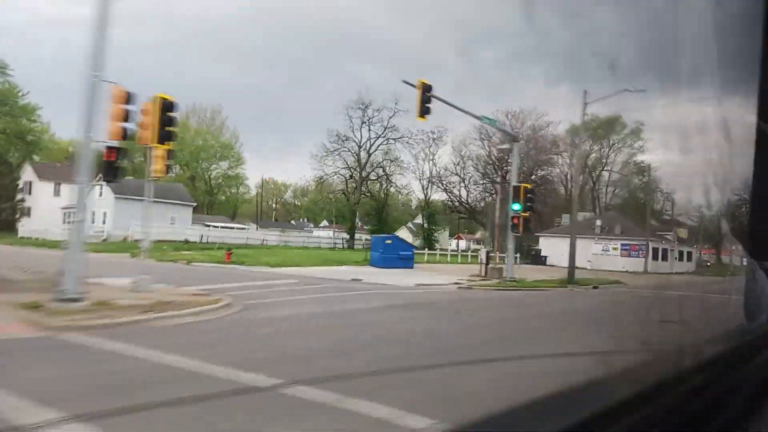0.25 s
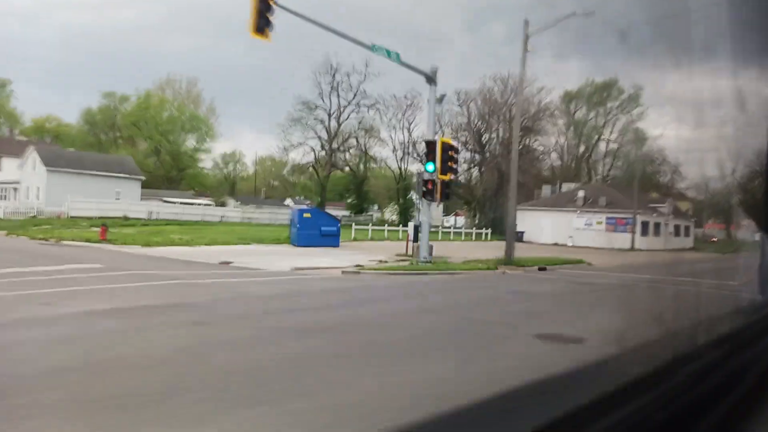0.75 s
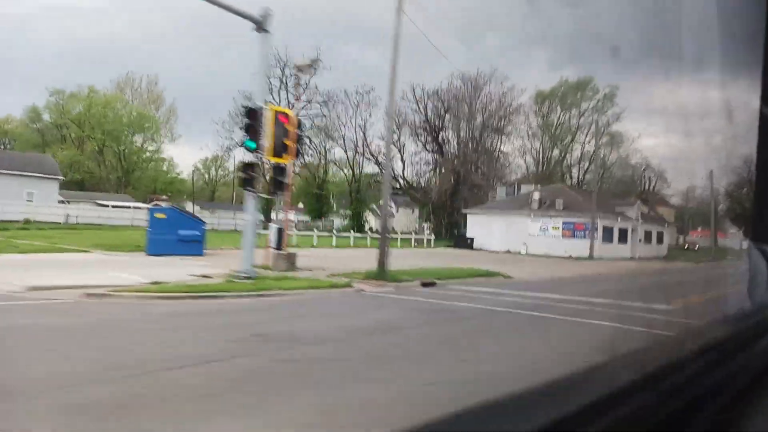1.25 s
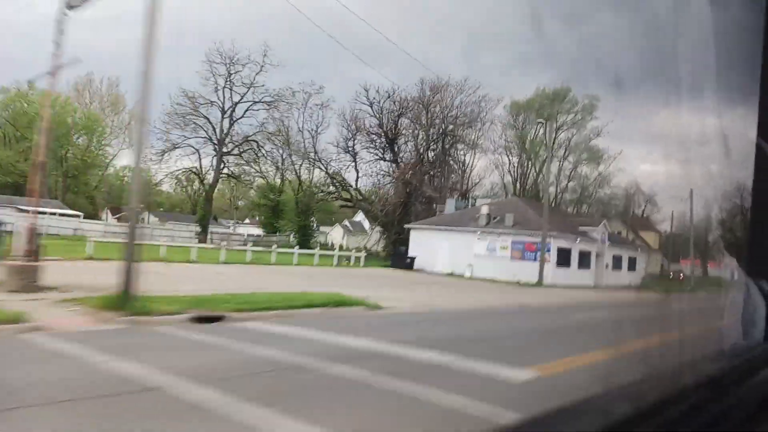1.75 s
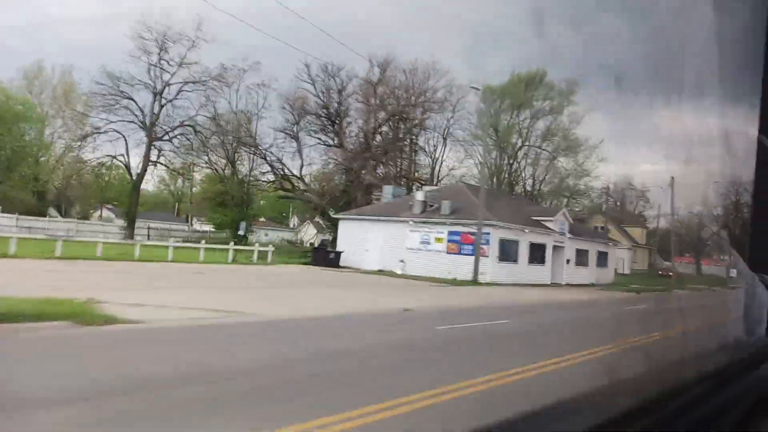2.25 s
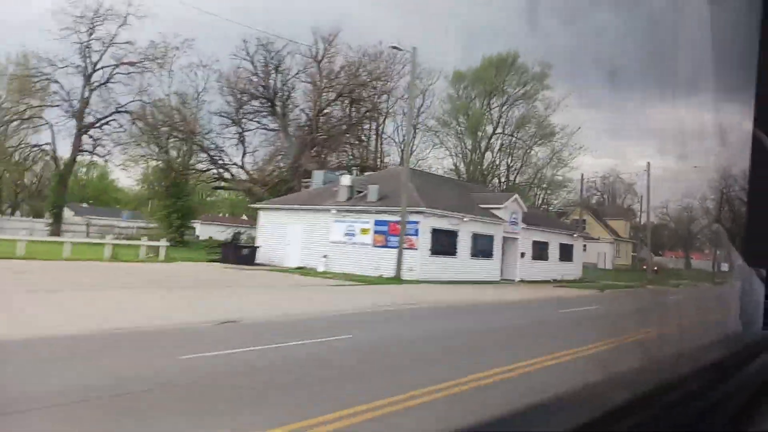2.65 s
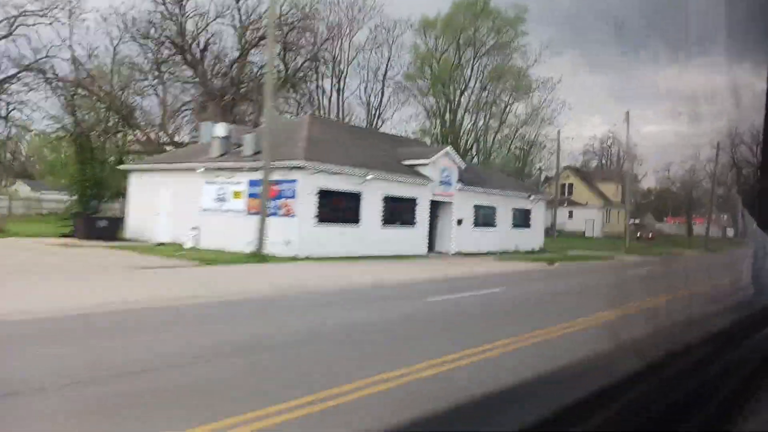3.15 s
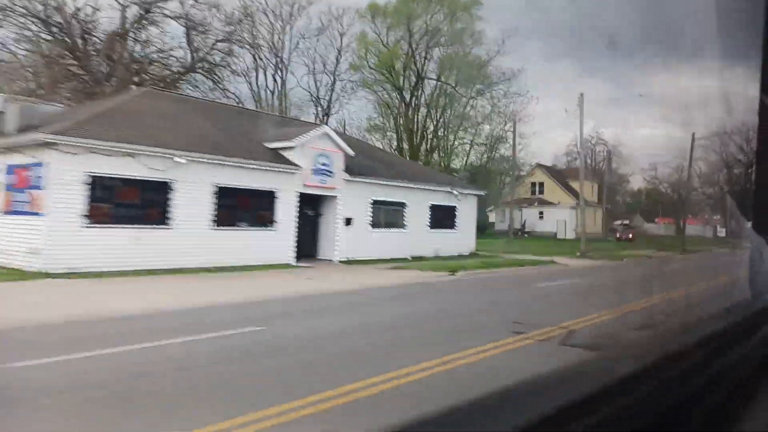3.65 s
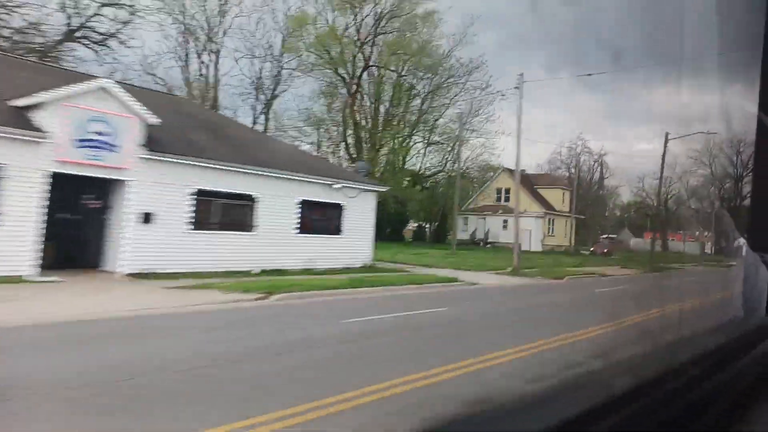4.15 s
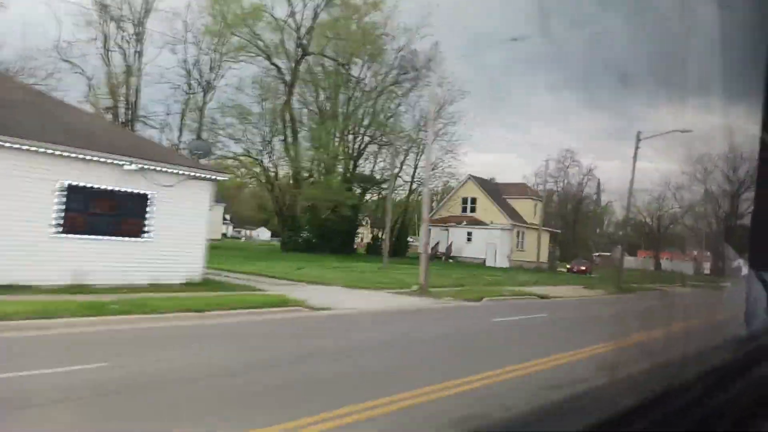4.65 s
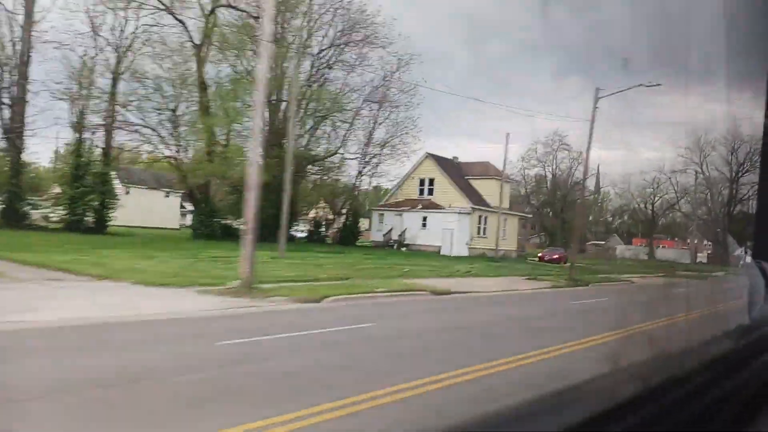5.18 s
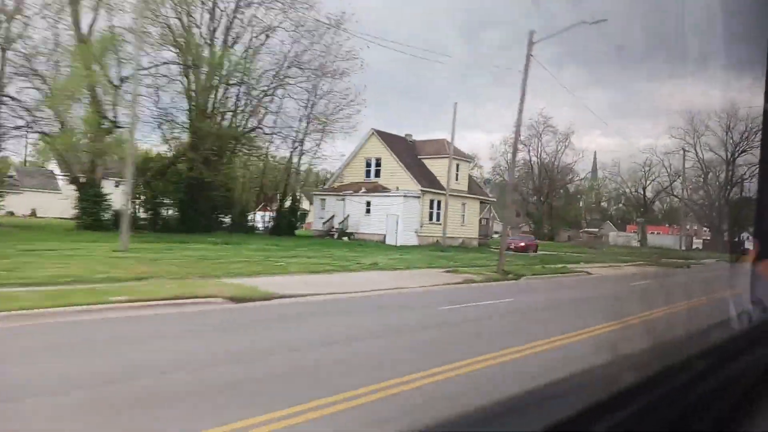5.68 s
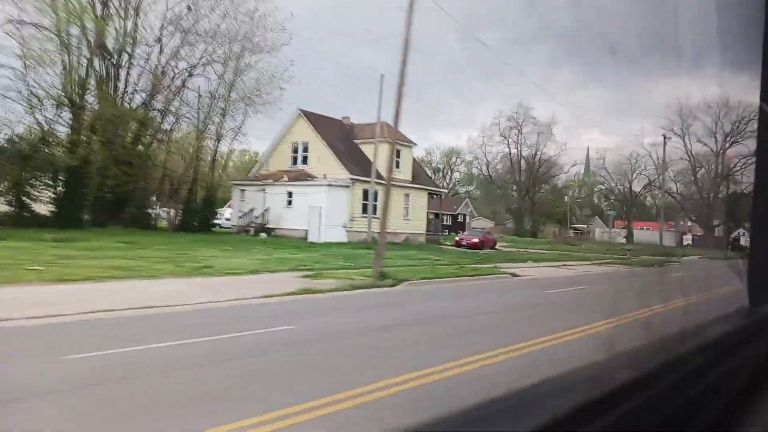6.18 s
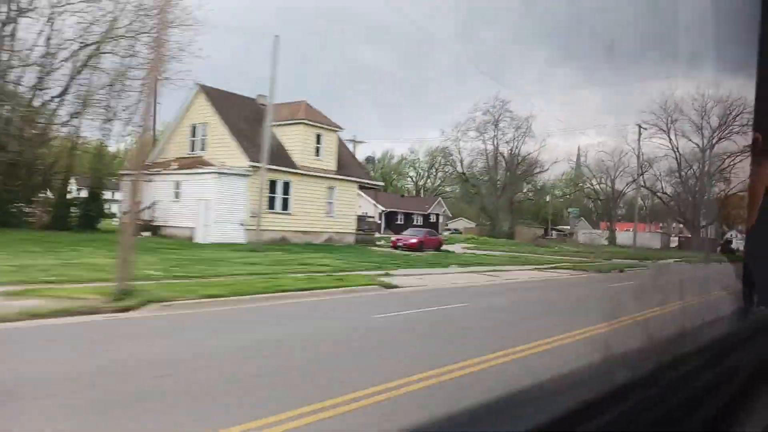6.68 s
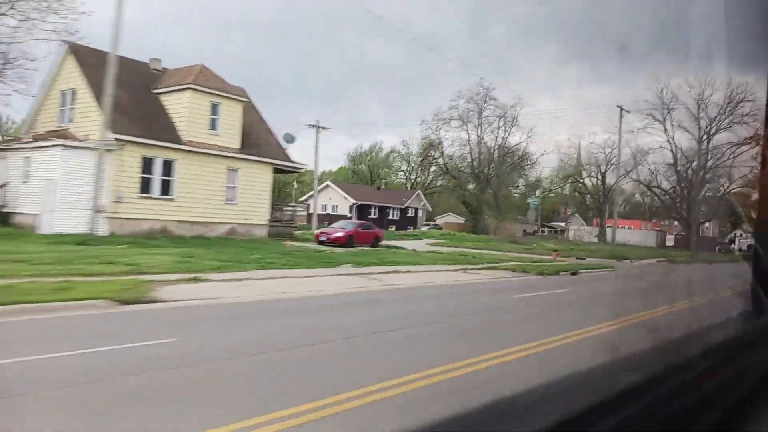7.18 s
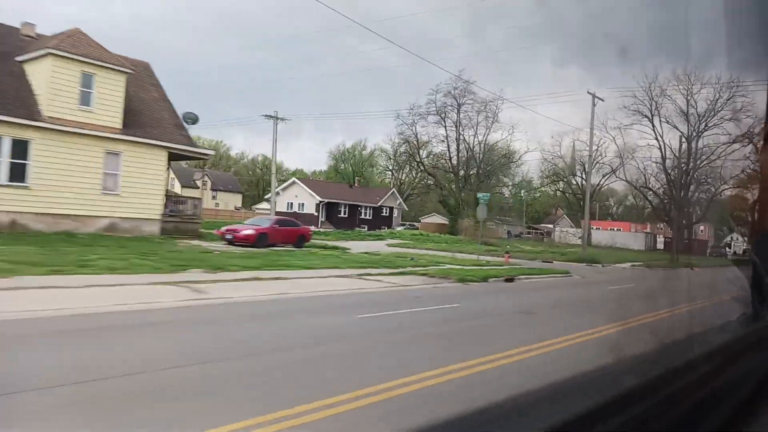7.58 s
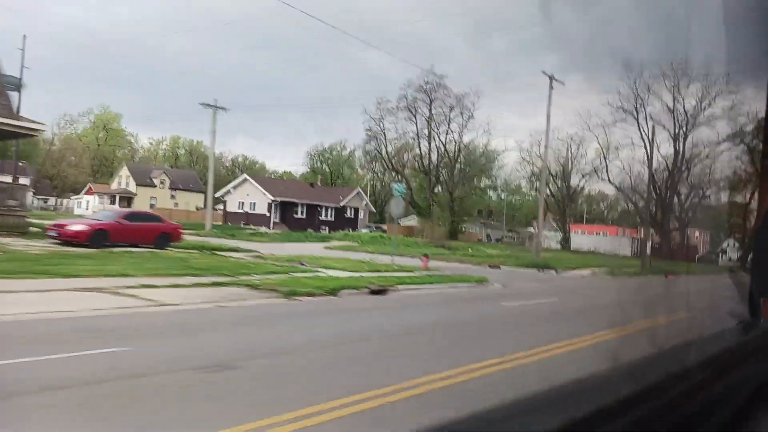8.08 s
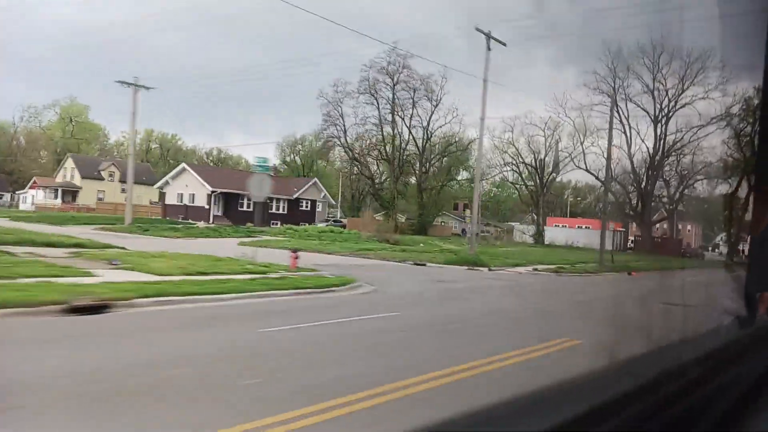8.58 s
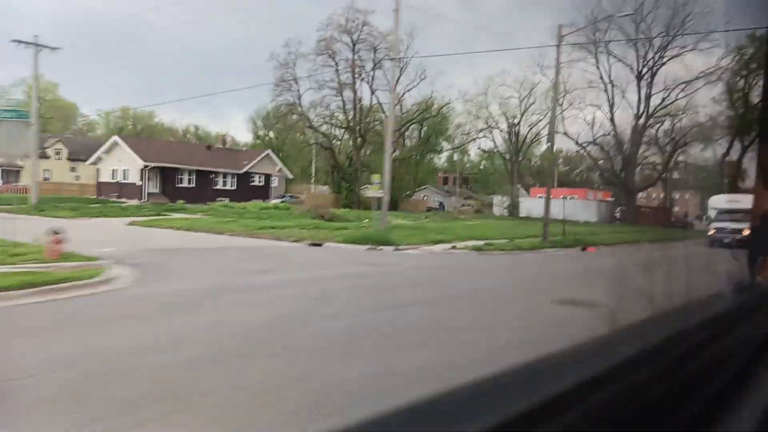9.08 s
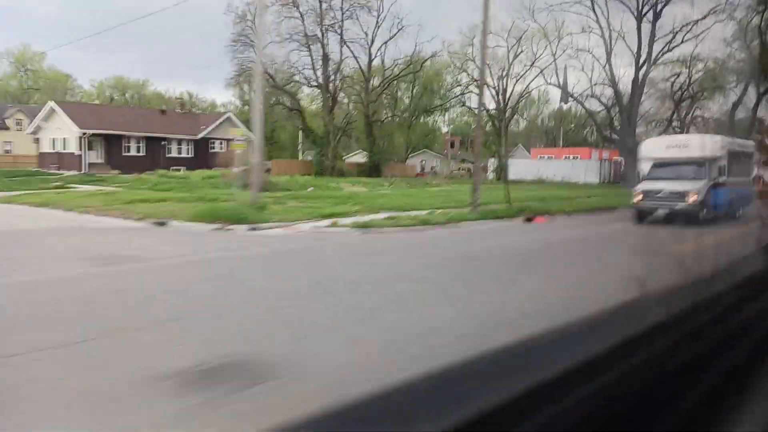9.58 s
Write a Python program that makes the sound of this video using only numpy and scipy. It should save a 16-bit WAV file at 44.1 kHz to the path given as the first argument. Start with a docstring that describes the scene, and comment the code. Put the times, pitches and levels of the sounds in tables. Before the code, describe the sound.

Close in a hard bus cabin, a continuous bassy rumble swells and eases with the road. The busiest moment is the first second, with a strong thump, chirping seat squeaks, bright clinks and dry ticks. Later jolts come singly or in clusters, shaking loose trim into grainy sizzle. Small suction-like pops strike the right channel of the hand-held stereo microphone. The drive continues unbroken.

```python
"""Inside a bus on a patched road

The body booms and thumps over bumps, tyres roar through the floor and air rushes past the glass: shaped noise
and short swings. A seat joint squeaks in brief wavering tones; trim clinks, ticks and rattles in the hard cabin.
The two ports of a hand-held recorder differ in colour, and the right one pops.
Levels and colours in the tables are those before the ports add their own colour."""
import sys
import numpy as np
from scipy import signal
from scipy.fft import rfft, irfft, next_fast_len
from scipy.io import wavfile
from scipy.ndimage import uniform_filter1d

SR = 44100
rng = np.random.default_rng(int(sys.argv[2]) if len(sys.argv) > 2 else 0)


def store_wav(level_fs):
    """Save 16-bit WAV to argv[1]."""
    pcm = np.round(np.clip(np.atleast_2d(level_fs), -1, 1) * 32767)
    wavfile.write(sys.argv[1], SR, pcm.T.astype(np.int16))


N = 433503   # length in samples
SIZE = next_fast_len(N + SR)   # transform length, with room for tails
HZ = np.maximum(np.arange(SIZE // 2 + 1) * SR / SIZE, 1)   # frequency of every bin
SIDES = np.array([[1], [-1]])   # left, right

# colour of rushing air and of dull rattles: f/Hz, relative level/dB
RUSH_COLOUR = [(1600, 3), (2700, 8), (3500, 4), (4800, 2.5), (5200, -2), (5850, -1.5), (6500, -6),
               (7500, -21), (9000, -33)]


def from_db(db):
    """Gain of a level in dB."""
    return 10 ** (np.asarray(db) / 20)


def rms_one(x):
    """Scaled to rms 1."""
    return x / np.sqrt(np.mean(x ** 2) + 1e-20)


def in_time(rows):
    """Columns of a curve table, one value a sample."""
    s, *columns = np.transpose(rows)
    return [np.interp(np.arange(N) / SR, s, c) for c in columns]


def at_hz(points):
    """A table over frequency, read at every bin on a logarithmic pitch scale."""
    hz, value = np.transpose(points)
    return np.interp(np.log(HZ), np.log(hz), value)


def add(track, s, sound):
    """Mixes a short sound in at a time."""
    i = max(round(s * SR), 0)
    track[..., i:i + sound.shape[-1]] += sound[..., :N - i]


def lead_turn():
    """Turns the phase of the left side ahead and of the right side back, by half the lead each."""
    # how far the left leads: f/Hz, phase/rad
    lead = [(30, 1), (50, 0.94), (70, 0.44), (100, 0.64), (300, 0.012), (700, 0.88)]
    return np.exp(.5j * at_hz(lead) * SIDES)


def left_leads(x):
    """A bass sound at both ports, the left one ahead in phase."""
    return irfft(rfft(x, SIZE) * lead_turn(), SIZE)[:, :N]


def noise(spectrum, hum=None):
    """Stereo noise of a colour, rms 1, alike in the bass, left ahead in phase; a panel may hum in it."""
    # left-right likeness: f/Hz, correlation (1 alike, 0 unrelated, below 0 opposed)
    likeness = [(30, 0.91), (60, 0.99), (290, 0.97), (640, 0.74), (1400, -0.34), (3000, 0.043)]
    mid, side = rfft(rng.standard_normal((2, SIZE)))
    alike = np.clip(at_hz(likeness), -.99, .99)
    pair = np.sqrt(1 + alike) * mid + np.sqrt(1 - alike) * side * SIDES
    pair = pair * lead_turn()
    inside = (HZ > spectrum[0][0]) * (HZ < spectrum[-1][0])
    gain = from_db(at_hz(spectrum)) * inside
    if hum:
        hz, width_hz, db = hum   # db: the boost against the noise around
        gain = gain * (1 + from_db(db) / (1 + (2 * (HZ - hz) / width_hz) ** 2))
    return rms_one(irfft(pair * gain, SIZE)[:, :N])


def tone(rows, fuzz, fade_s):
    """A faint narrow tone that fades in and out and flutters."""
    hz, db = in_time(rows)
    t = np.arange(N) / SR
    on = np.clip(np.minimum(t - rows[0][0], rows[-1][0] - t) / fade_s, 0, 1)
    flutter = 1 + fuzz * rms_one(uniform_filter1d(rng.standard_normal(N), size=700))
    sine = np.sin(2 * np.pi * np.cumsum(hz) / SR)
    return np.sqrt(2) * from_db(db) * on * flutter * sine


def strikes(rows, modes, contact_s):
    """Each blow rings the modes, with strengths and slight tunings drawn afresh."""
    out, t = np.zeros(N), np.arange(SR // 10) / SR
    chance = rng.standard_normal((len(rows), len(modes), 2))
    onset = 1 - np.exp(-t / contact_s)
    for (s, db, low_db), uneven in zip(rows, chance):
        for (hz, mode_db, t60), (strength, tuning) in zip(modes, uneven):
            start_db = db + mode_db + 2 * strength + low_db * (hz < 4000)
            level = from_db(start_db - 60 * t / t60)
            add(out, s, level * onset * np.sin(2 * np.pi * hz * (1 + 0.018 * tuning) * t))
    return out


def cabin(x, dry_db):
    """The dry sound, a little later on the right, and a dense tail on each side whose treble dies first."""
    t60_s, treble_t60_s, treble_hz, tail_db = 0.33, 0.23, 5500, 2
    t, white = np.arange(SR // 2) / SR, rng.standard_normal((2, SR // 2))
    low = signal.sosfiltfilt(signal.butter(2, treble_hz, fs=SR, output="sos"), white)
    tail = low * from_db(-60 * t / t60_s) + (white - low) * from_db(-60 * t / treble_t60_s)
    tail = tail * np.minimum(t / 0.0028, 1)   # builds up over 2.8 ms
    tail *= from_db(tail_db) / np.sqrt(np.sum(tail ** 2, axis=1, keepdims=True))
    tail[0, 0] = tail[1, 22] = from_db(dry_db)   # right side 22 samples later
    return signal.fftconvolve(x[None], tail, axes=1)[:, :N]


def body_boom(boom_db):
    """Two low modes of the bus body, as two bands of noise whose level follows a curve."""
    # colours of the two modes: f/Hz, relative level/dB
    lower_mode = [(18, -44), (30, -7), (44, -8), (54, -3.5), (70, -35)]
    upper_mode = [(40, -48), (50, 3), (60, 0.5), (72, 5), (95, -12.5), (120, -58)]
    modes = noise(lower_mode) + from_db(-1.5) * noise(upper_mode)
    return from_db(boom_db) * rms_one(modes)


def jolts():
    """Each bump swings the body for a few cycles; returns the thumps and their envelope."""
    # wheels over bumps: t/s, peak of the envelope/dB, f/Hz
    bumps = [(.31, -43, 63), (0.513, -10, 44.3), (.7, -37, 45.5), (0.88, -20, 64.5), (1.909, -24, 46.6),
             (2.141, -24.5, 39), (2.27, -26, 59.5), (2.321, -22, 43), (2.439, -27, 59.3), (2.55, -22.5, 58),
             (3.461, -29, 59), (3.59, -22, 51.5), (3.95, -42, 59.6), (4.56, -26, 64.4), (4.641, -20.5, 48),
             (4.731, -22.5, 59.6), (6.2, -31, 55), (6.841, -29, 51), (6.992, -20, 57.2), (7.089, -22, 51),
             (7.219, -26, 66.5), (7.289, -15.5, 67.6), (7.459, -20, 41.4), (8.658, -33, 58.3),
             (8.78, -20.5, 66.5), (8.86, -33, 42.6), (8.97, -18, 46.2), (9.04, -19.5, 58.3),
             (9.23, -24.5, 39.2)]
    rise_s = 0.024
    thumps, swell, t = np.zeros(N), np.zeros(N), np.arange(SR // 3) / SR
    shape = t / rise_s * np.exp(1 - t / rise_s)
    for (s, db, hz), turn in zip(bumps, rng.random(len(bumps))):
        add(thumps, s, from_db(db) * shape * np.sin(2 * np.pi * (hz * t + turn)))
        add(swell, s, from_db(db) * shape)
    return thumps, swell


def tyre_noise(boom_db, roar_db, swell):
    """Rumble and roar through the floor: noise in which two panels hum, shaken up further by jolts."""
    # colours: f/Hz, relative level/dB
    rumble_colour = [(56, -45), (95, 3), (151, -2), (179, -4.5), (210, -10), (227, -11), (261, -9.5),
                     (320, -13.5), (420, -27), (700, -120)]
    roar_colour = [(190, -46), (320, -5.5), (441, -2.5), (523, -6.5), (592, -4), (648, -3.5), (824, -7),
                   (1220, -10), (1480, -7), (1610, -11.5), (1780, -9), (2700, -22.5), (3510, -30),
                   (5940, -120)]
    # the rumble takes part in 0.55 of the boom's swing in dB
    rumble_gain = from_db(-37.5 + 0.55 * (boom_db - boom_db.mean()))
    rumble = np.hypot(rumble_gain, from_db(-16) * swell)
    roar = np.hypot(from_db(roar_db), from_db(-23) * swell)
    floor_hum, wall_hum = (257, 6.3, 0), (659, 20.4, 0)   # f/Hz, width/Hz, boost/dB
    return rumble * noise(rumble_colour, floor_hum) + roar * noise(roar_colour, wall_hum)


def air_rush(rush_db):
    """Air past the glass: a band of noise whose level follows a curve."""
    return from_db(rush_db) * noise(RUSH_COLOUR)


def groan():
    """A panel groans over a dip: one gliding, fluttering tone."""
    # t/s, f/Hz, level/dB
    glide = [(7.19, 285, -35), (7.232, 256.7, -36.5), (7.36, 290, -40)]
    return tone(glide, fuzz=0.22, fade_s=0.021)


def knocks():
    """Knocks through the floor ring a few low modes that die within hundredths of a second."""
    # t/s, strength/dB
    blows = [(0.541, -20), (0.598, -25), (2.446, -22), (4.682, -21), (8.781, -25.5), (9.02, -18)]
    # f/Hz, relative level/dB, time to fall 60 dB/s
    modes = [(124, -3, 0.041), (170, -27, 0.033), (250, -11, .03), (356, -6, 0.025), (419, 0, 0.028),
             (620, -14, 0.013)]
    return strikes([(s, db, 0) for s, db in blows], modes, contact_s=0.00096)


def squeaks():
    """Each slip is a brief stick-slip tone in a rasp; it catches low, climbs, wavers and sags."""
    # t/s, strength before cabin and frame/dB, basic f/Hz, length/ms (held within 2 to 50)
    slips = [(0, -30, 3730, 10.4), (.0625, -26, 3820, 8.5), (.237, -26, 3820, 10.6), (.306, -27, 3790, 12),
             (.4365, -26.5, 3912, 8.1), (.633, -25, 3970, 11.5), (.634, -34, 4580, 25),
             (.653, -30, 3860, 8.8), (.7085, -25.5, 3900, 12.6), (.711, -37.5, 4550, 25),
             (.789, -28, 3860, 8.7), (.806, -38, 3880, 12), (.862, -28, 3800, 7.6),
             (1.0365, -29, 3940, 7.4), (1.2385, -41.5, 3775, 20), (1.292, -41.5, 3830, 15),
             (1.671, -34.5, 3900, 7.8), (2.2795, -20.5, 3830, 11.5), (2.296, -31, 3950, 9.8),
             (2.314, -33, 3830, 12), (2.522, -46, 3940, 17), (2.544, -31.5, 3740, 11),
             (2.598, -48, 3990, 68), (4.5975, -25.5, 3880, 15.7), (4.6615, -22.5, 3974, 10),
             (4.695, -36, 4050, 4.4), (4.858, -42, 3960, 10.5), (4.895, -54, 4050, 12),
             (8.474, -42, 4070, 10), (8.533, -29, 3817, 10.3), (8.774, -38.5, 3810, 21),
             (8.902, -34.5, 3860, 9), (9.025, -30.5, 4010, 4.1), (9.1705, -30.5, 3800, 9.3),
             (9.441, -33, 3805, 7.3)]
    # multiple of the pitch, relative level/dB
    overtones = [(1, -0.5), (2, -13), (3, -18.5)]
    # colour of the rasp: f/Hz, relative level/dB
    rasp_colour = [(2400, -42), (3000, -6), (3450, -6), (3850, 4.5), (4080, -2), (4300, -21), (5000, -21),
                   (8000, -28.5), (16000, -30)]
    catch_share, climb_s = 0.14, 0.0012   # how far below its pitch a slip catches, how fast it climbs
    sag_share_per_s, waver_share = 0.53, 0.015
    out, chance = np.zeros(N), rng.standard_normal((len(slips), 2, 2600))
    rasp = noise(rasp_colour)[0]
    for (s, db, hz, ms), (waver, grit) in zip(slips, chance):
        t = np.arange(round(np.clip(ms, 2, 50) * SR / 1000)) / SR
        wander = np.interp(1000 * t, np.arange(50), waver[:50])   # a new target each millisecond
        share = 1 - catch_share * np.exp(-t / climb_s) - sag_share_per_s * t + waver_share * wander
        phase = 2 * np.pi * np.cumsum(hz * share) / SR
        scrape_db = -5 + .3 * (db + 28)   # harder slips rasp more
        sound = from_db(scrape_db) * rms_one(rasp[round(s * SR):][:len(t)])
        for k, level_db in overtones:
            # higher overtones stutter faster and deeper
            stutter = rms_one(np.convolve(grit, np.hanning(160 // k), "valid"))[:len(t)]
            sound = sound + from_db(level_db) * np.sin(k * phase) * rms_one(1 + .75 * k * stutter)
        fade = np.sin(np.pi * t / t[-1]).clip(0) ** .12
        add(out, s, from_db(db) * sound * fade)
    return out


def frame(x):
    """The modes of the seat frame, set ringing; each side hears them with phases of its own."""
    # f/Hz, relative level/dB, time to fall 60 dB/s
    modes = [(3521, -6, .22), (3632, -6, .2), (3745, -4, .22), (3812, -1, .3), (3865, -1, .3),
             (3946, -6, .22), (4012, -1, .25), (4107, -7, .2)]
    t = np.arange(SR // 3) / SR
    turns = rng.random((len(modes), 2, 1))
    ring = np.zeros((2, len(t)))
    for (hz, db, t60), turn in zip(modes, turns):
        ring += from_db(db - 60 * t / t60) * np.sin(2 * np.pi * (hz * t + turn))
    ring = ring * np.minimum(t / .003, 1)
    # energy of the ring beside the slip: -21 dB
    ring = from_db(-21) * ring / np.sqrt(np.sum(ring ** 2, axis=1, keepdims=True))
    return signal.fftconvolve(x[None], ring, axes=1)[:, :N]


def clinks():
    """Metal clinks: blows that ring a cluster of high modes for a few milliseconds."""
    # t/s, strength before the cabin/dB, extra for modes below 4 kHz/dB
    blows = [(0.5501, -18, -2), (0.6436, -35, -10), (0.7088, -27, 0), (0.7981, -27, 9), (0.8904, -26, 12),
             (2.2902, -38, -14), (2.3111, -19, 1), (2.3426, -36, -11), (2.4582, -35, 10),
             (2.5451, -39, -14), (2.589, -31, -15), (3.537, -29, -15), (3.5865, -20.5, -3),
             (3.603, -44, -11), (4.7012, -24, 5), (6.085, -60, -9), (8.7101, -28, 2), (8.778, -31, 7),
             (9.0247, -18, 2), (9.3722, -26, 4)]
    # f/Hz, relative level/dB, time to fall 60 dB/s
    modes = [(3020, -11, .018), (3300, -13, .007), (3700, -13, .005), (4300, -12, .005), (4700, -8, .007),
             (5050, -4, .009), (5400, -6, .008), (5750, -9, .007), (6200, -14, .005)]
    return strikes(blows, modes, contact_s=0.0011)


def ticks():
    """Dry plastic ticks: millisecond cracks of noise close to the recorder, with hardly any tail."""
    # t/s, strength before colouring/dB
    cracks = [(0.4933, -41), (0.5194, -34), (0.5413, -24.5), (0.7077, -29), (1.026, -37.5), (1.4995, -48),
              (1.7753, -44.5), (1.9076, -48), (2.4425, -41), (2.99, -37), (3.13, -41), (3.379, -41),
              (4.131, -46), (4.3001, -44), (5.1195, -37.5), (5.3378, -48), (5.5326, -40.5), (6.3574, -44),
              (6.8414, -43), (6.9476, -42), (7.958, -48), (8.585, -32), (8.755, -47), (8.959, -46),
              (9.0089, -40), (9.181, -34), (9.2893, -44), (9.7648, -36.5)]
    # colour: f/Hz, gain/dB
    colour = [(2000, -2), (4000, 8.5), (7000, 1), (11000, 3), (16000, 3)]
    out, t = np.zeros((2, SIZE)), np.arange(SR // 50) / SR
    decay = from_db(-60 * t / 0.016) + 0.15 * from_db(-60 * t / 0.19)
    for (s, db), crack in zip(cracks, rng.standard_normal((len(cracks), 2, len(t)))):
        add(out[:, :N], s, from_db(db) * crack * decay)
    return irfft(rfft(out) * from_db(at_hz(colour)), SIZE)[:, :N]


def pops():
    """A quick push on the right membrane: one short suction pulse, on that side only."""
    # t/s, peak/dB
    pushes = [(.3395, -5.5), (.404, -17), (0.5215, -6), (.528, -13), (.535, -15), (0.6022, -6),
              (.7102, -25), (.7736, -6.5), (0.8605, -8), (.9301, -10), (2.4455, -18), (4.501, -12.5),
              (4.6722, -12), (4.7363, -19), (4.916, -22), (7.4131, -15), (7.486, -16.5), (8.756, -20),
              (8.929, -20), (9.0023, -15), (9.013, -14), (9.3388, -15.5), (9.8132, -22)]
    out, t = np.zeros((2, N)), np.arange(100) / SR
    pulse = -np.exp(-((t - .0003) / .00008) ** 2)
    pulse += 0.045 * np.exp(-t / 0.0035) * (t > .0004)   # faint swing back
    for s, db in pushes:
        add(out[1], s - .0003, from_db(db) * pulse)
    return out


def thin_tones():
    """Thin narrow tones: a clink's ring, faint whistles, two partials of a slower squeak."""
    # one curve a tone: t/s, f/Hz, level/dB
    curves = [
        [(.549, 3010, -37), (.558, 3040, -35), (.58, 3100, -55)],
        [(.696, 5650, -50), (.716, 5657, -48), (.756, 5667, -62)],
        [(1.19, 2710, -54), (1.21, 2715, -59), (1.272, 2705, -57)],
        [(6.93, 5830, -61), (6.99, 5870, -64), (7.025, 5880, -58), (7.11, 5850, -62), (7.15, 5860, -67),
         (7.215, 5840, -68)],
        [(9.442, 2880, -36), (9.452, 2865, -43), (9.468, 2860, -55), (9.515, 2890, -57)],
        [(9.442, 1915, -50), (9.46, 1905, -48), (9.485, 1905, -56)],
    ]
    return sum(tone(rows, fuzz=0.49, fade_s=.005) for rows in curves)


def rattle(level, colour):
    """Many tiny contacts of loose trim blur into a grainy sizzle: noise with a new gain each millisecond."""
    grains = from_db(1.2 * np.minimum(rng.exponential(1, N // 44 + 1), 5))
    return level * rms_one(noise(colour) * np.repeat(grains, 44)[:N])


def shivers():
    """Trim shivers after a jolt: a bright and a dull rattle, each setting in at once and fading."""
    # t/s, time to fall to 1/e/s, bright level/dB, dull level/dB
    bursts = [(.493, 0.063, -42, -39.5), (.548, 0.11, -45, -36), (0.627, 0.025, -43, -45),
              (0.703, 0.072, -46, -43), (1.032, 0.074, -52, -51), (2.176, 0.1, -59, -51),
              (2.278, 0.1, -46, -42), (3.52, 0.09, -56, -48.5), (3.58, 0.083, -57, -45),
              (3.968, .07, -54, -50), (4.6, 0.17, -54, -51), (5.74, 0.073, -60, -54),
              (6.01, 0.13, -49.5, -52), (6.081, 0.039, -50, -46), (7.026, 0.052, -55, -70),
              (7.255, 0.16, -54, -51.5), (8.754, 0.089, -58, -41.5), (9.023, 0.047, -52, -41),
              (9.295, 0.18, -56, -47.5)]
    # colour of the bright part: f/Hz, relative level/dB
    bright_colour = [(4120, -10), (7000, -4.5), (9000, -8.5), (11600, -4), (13600, -5), (15500, -6),
                     (16300, -15)]
    level = np.zeros((2, N))
    for s, length, bright_db, dull_db in bursts:
        part = np.arange(0, 2 * length, 1 / SR) / length
        add(level, s, from_db([[bright_db], [dull_db]]) * np.exp(-part ** 3))
    bright, dull = level
    return rattle(bright, bright_colour) + rattle(dull, RUSH_COLOUR)


def sizzle():
    """Loose trim sizzles all along, now calm, now lively."""
    # t/s, level/dB
    liveliness = [(0, -61), (.15, -63), (.3, -57), (.93, -53.5), (1.08, -66), (1.75, -67), (2.0, -63.5),
                  (2.4, -57.5), (2.7, -64.5), (3.9, -61), (4.7, -59), (4.95, -65), (5.5, -61.5), (6.2, -58),
                  (6.7, -61), (7.6, -57), (7.95, -62.5), (8.6, -60), (9.83, -60.5)]
    # colour: f/Hz, relative level/dB
    colour = [(4120, -16), (7000, -8.5), (7650, -9.5), (11600, -7.5), (13600, -7), (15000, -10),
              (16100, -12), (16300, -13)]
    return rattle(from_db(in_time(liveliness)[0]), colour)


def shade(right):
    """The treble of the right port sinks above a wandering edge."""
    # t/s, edge f/Hz
    edge_curve = [(.2, 5370), (.6, 5800), (1.0, 7100), (2.6, 7100), (4.9, 6100), (5.4, 7000), (6.6, 6750),
                  (7.4, 6200), (8.6, 6850), (9.2, 5800), (9.8, 5040)]
    drop_db, width_hz = -12.5, 210
    hz, s, frames = signal.stft(right, SR, nperseg=256)
    edge = np.interp(s, *np.transpose(edge_curve))
    gain = from_db(drop_db / (1 + np.exp((edge - hz[:, None]) / width_hz)))
    return signal.istft(frames * gain, SR, nperseg=256)[1][:N]


def scene():
    """Road and body noise under the small sounds of the cabin."""
    # how loud the road and air are over time: t/s, body boom/dB, tyre roar/dB, air rush/dB
    road_levels = [(0, -34, -39, -56), (.2, -28.5, -40, -53), (.33, -25.5, -38.5, -42),
                   (.6, -24.5, -41, -58), (.93, -27.5, -40, -43.5), (1.08, -33.5, -43.5, -57),
                   (1.45, -37, -44.5, -54), (1.75, -38, -44.5, -58.5), (2.15, -30, -42.5, -52),
                   (2.35, -24.5, -38, -46.5), (2.65, -30, -41, -52), (3.2, -31.5, -42, -55),
                   (4.0, -28, -38.5, -50.5), (4.62, -27.5, -38, -46), (4.95, -30.5, -39.5, -52.5),
                   (5.6, -32.5, -40.5, -51.5), (6.2, -28.5, -38, -51), (7.3, -26, -38, -48.5),
                   (7.9, -31, -40, -52), (8.5, -28.5, -39.5, -51), (8.9, -26, -38.5, -50),
                   (9.3, -27, -40.5, -49.5), (9.5, -26, -40.5, -52), (9.83, -30, -39.5, -49)]
    boom_db, roar_db, rush_db = in_time(road_levels)
    thumps, swell = jolts()
    body = body_boom(boom_db) + left_leads(thumps) + groan()
    road = tyre_noise(boom_db, roar_db, swell) + knocks()
    air = air_rush(rush_db)
    slips = squeaks()
    seats = from_db(-3.0) * cabin(slips, dry_db=2.0) + frame(slips)
    trim = from_db(-2.0) * cabin(clinks(), dry_db=11.0)
    trim = trim + ticks() + shivers() + sizzle()
    return body + road + air + seats + trim + thin_tones() + pops()


def record(dry):
    """Each port has its own causal colour; the right treble is shaded and the top is cut."""
    # colour of the ports: f/Hz, left minus right/dB
    ports = [(60, 1), (83, -2), (160, -3), (300, 0.5), (420, 1.5), (580, -2), (810, -1.5), (1120, 6),
             (1540, 2.5), (2140, -1), (2960, -1.5), (4090, -4.5), (5660, -14.5), (7000, -8.5), (8000, -3.5),
             (10800, -3), (15000, -8.5)]
    log_gain = np.log(from_db(at_hz(ports) * .5 * SIDES))
    cepstrum = irfft(log_gain, SIZE)
    cepstrum[:, 1:SIZE // 2] *= 2          # folding the cepstrum gives minimum phase
    cepstrum[:, SIZE // 2 + 1:] = 0
    wet = irfft(rfft(dry, SIZE) * np.exp(rfft(cepstrum)), SIZE)[:, :N]
    wet = np.stack([wet[0], shade(wet[1])])
    top_cut = signal.cheby2(24, 70, 16100, fs=SR, output="sos")   # 70 dB down from 16.1 kHz
    return signal.sosfilt(top_cut, wet)


dry = scene()
out = record(dry)
store_wav(out)
```